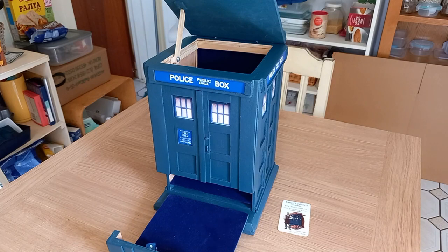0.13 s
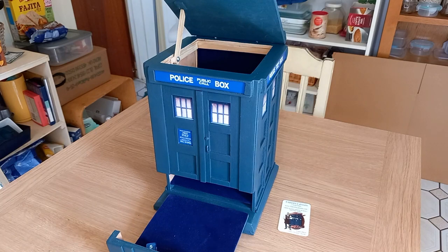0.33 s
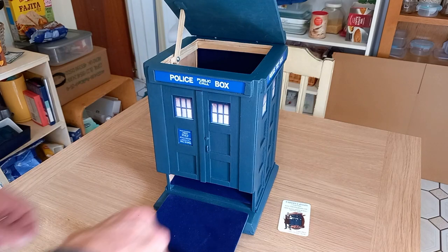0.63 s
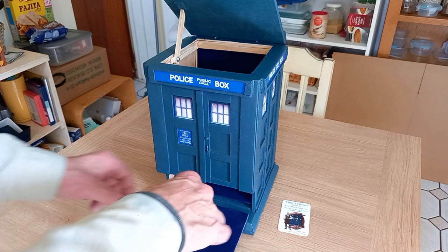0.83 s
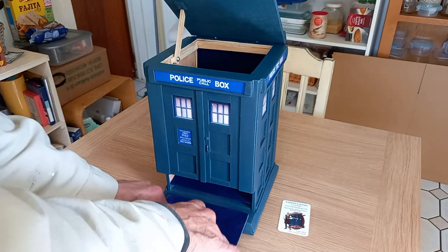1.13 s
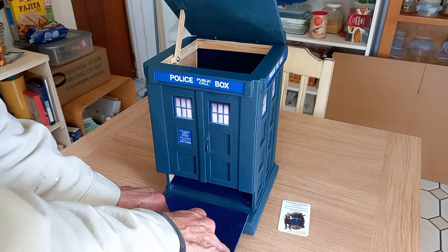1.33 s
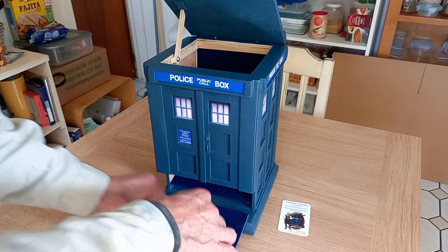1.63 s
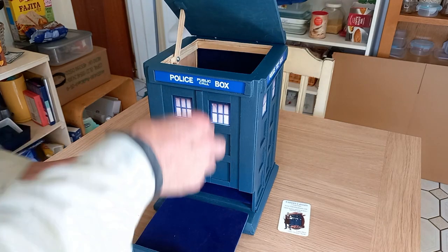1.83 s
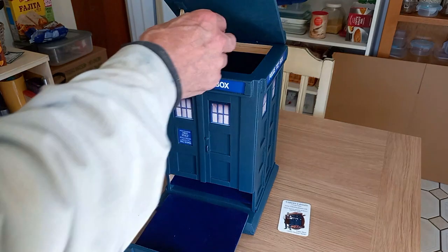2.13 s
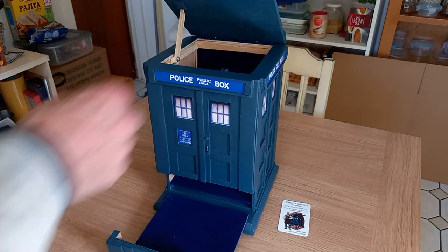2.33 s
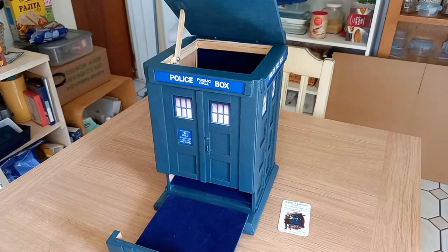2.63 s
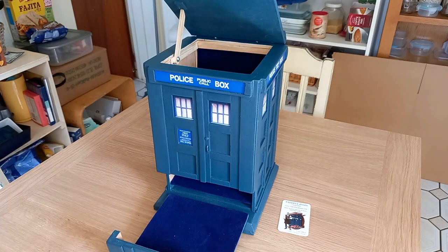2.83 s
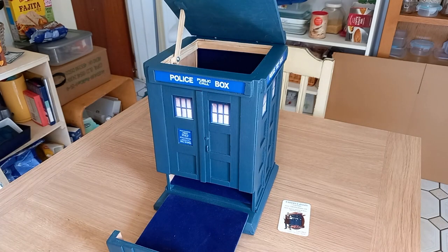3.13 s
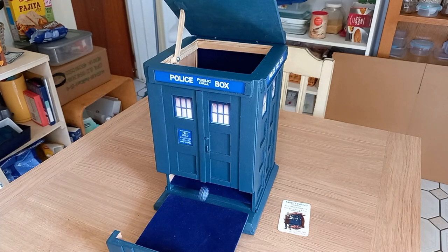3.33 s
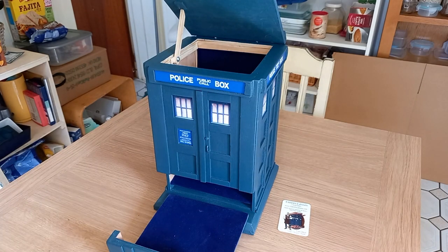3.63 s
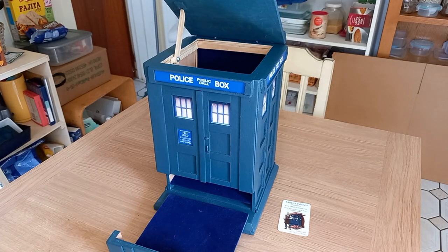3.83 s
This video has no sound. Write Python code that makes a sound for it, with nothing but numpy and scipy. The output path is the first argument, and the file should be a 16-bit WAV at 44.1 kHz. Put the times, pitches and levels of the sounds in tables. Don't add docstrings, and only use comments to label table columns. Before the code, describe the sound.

A die knocks down through a hollow wooden tower in rapid uneven blows, slides out, lands with a sharp knock on a felt-covered tray, rolls briefly and settles; close microphone, quiet furnished room, very faint birds before.

```python
import sys
import numpy as np
from scipy import signal
from scipy.fft import rfft, irfft
from scipy.io import wavfile
from scipy.ndimage import uniform_filter1d

SR = 44100
rng = np.random.default_rng(int(sys.argv[2]) if len(sys.argv) > 2 else 0)


def how_loud(loudness_db):
    steps = np.asarray(loudness_db, float) / 20
    return 10 ** steps


def persist_wave(psi):
    counts = np.round(np.clip(psi, -1, 1) * 32767).astype(np.int16)
    wavfile.write(sys.argv[1], SR, np.atleast_2d(counts).T)


N = 176400

# hz, level_db
AIR_SPECTRUM = [(20, -31.5), (45, -4), (92, -3.5), (200, -9.5), (530, -18), (1500, -13.5), (5000, -29),
                (16000, -35)]
AIR_DB = -72
# hz, left_right_likeness [0-1]
STEREO_LIKENESS = [(60, 0.45), (200, 0.43), (600, 0.58), (1500, 0.088), (4000, 0.05), (12000, 0.031)]

# hz, level_db
CHORUS_SPECTRUM = [(1300, -29), (1900, -16), (2500, -10), (3000, -1.5), (3700, -2.5), (4300, -9.5),
                   (4700, -16), (7000, -32.5)]
# time_s, level_db, left_minus_right_db
CHORUS_LEVEL = [(0, -69, 5), (0.901, -62, 4), (1.3, -67.5, 5), (1.8, -65.5, -1.5), (3.5, -63.5, -4),
                (4, -67, 1)]
# start_s, end_s, level_db, low_hz, high_hz
FLOCK_PASSES = [
    (-.2, .55, -69.5, 4150, 5400),
    (-.2, .8, -69, 1730, 2500),
    (1.3, 1.75, -90, 5000, 6770),
    (1.72, 2.5, -66, 4300, 7240),
    (3.55, 4.3, -66, 2130, 2920),
    (3.8, 4.3, -83, 8500, 10500),
]
# start_s, length_s, from_hz, to_hz, level_db
BIRD_NOTES = [(0.0, 0.073, 2900, 2898, -57.5), (0.001, 0.065, 4300, 4500, -62),
              (0.091, 0.37, 1825, 1880, -65), (0.373, 0.2, 2120, 2060, -65),
              (0.627, 0.14, 5720, 5460, -62.5), (1.106, 0.099, 4270, 4250, -62.5),
              (1.287, 0.093, 7140, 5770, -67.5), (1.358, 0.061, 5900, 3900, -68),
              (1.405, 0.092, 3900, 3004, -60.5), (1.719, 0.17, 3050, 3400, -62),
              (1.762, 0.088, 6800, 6100, -61), (1.737, 0.099, 4690, 4010, -59),
              (1.898, 0.055, 4920, 3710, -60), (1.925, 0.099, 7000, 5770, -52.5),
              (2.102, 0.15, 6900, 5800, -54), (2.103, 0.066, 4700, 3620, -55.5),
              (3.955, 0.028, 3300, 4500, -65.5)]
BIRD_ECHO_T60_S, BIRD_WOBBLE, BIRD_DIRECT_DB = 1.6, 0.0047, -18.5
# start_s, length_s, pitch_hz, level_db, second_partial_db
DOVE_COOS = [
    (0.104, 0.3, 353, -83.5, -5),
    (0.61, 0.25, 260, -83, -16),
    (1.012, 0.197, 320, -80.5, -17),
    (1.206, 0.18, 337, -79.5, -14),
    (1.344, 0.066, 248, -76, -25),
]

# start_s, end_s, level_db
SLEEVE_RUSTLE = (0.68, 1.03, -75.5)
# hz, level_db
SLEEVE_SPECTRUM = [(6000, -27), (8000, -5), (11000, 5), (12500, -26)]
# time_s, level_db
FAINT_TICK = (.5, -52)

# start_s, pitch_hz, level_db, t60_s
TABLE_THUMPS = [
    (2.393, 73.8, -37, 0.099),
    (2.683, 151.4, -60, .1),
    (3.131, 102, -52, 0.19),
    (3.558, 110, -49.5, .2),
    (3.565, 168, -52, 0.27),
    (3.745, 160.8, -66, .15),
]
# hz, level_db
THUD_SPECTRUM = [(30, -20), (60, -2), (110, 3), (180, -4)]

# hz, t60_s
ROOM_DECAY = [(250, 0.03), (1500, 0.3766), (6000, 0.0635), (15000, 0.14)]
# hz, level_db
ROOM_COLOUR = [(250, -2.5), (1500, 2), (6000, 7), (14000, 4.5)]
LEFT_DB, MIC_LOW_HZ, BASS_LEAK_DB = 0.5, 243.5, -41.5

# start_s, end_s, level_db
TRUNDLE_TO_CHUTE = (2.88, 3.1, -49)
CHUTE_SLIDE = (3.02, 3.155, -43.5)
TRAY_ROLL = (3.2, 3.43, -31.5)
ROLL_CONTACTS_PER_S, SLIDE_CATCHES_PER_S = 95, 76
# hz, level_db
ROLL_SPECTRUM = [(200, -2.0), (330, -2.0), (480, 7.5), (650, -0.5), (780, -8), (890, 5.5), (1000, -13.5),
                 (2500, -22.5), (5000, -50.5)]
SLIDE_SPECTRUM = [(320, 8), (1500, -7), (2300, 1), (3000, -15), (3900, -4), (5200, -17.5), (6600, -17),
                  (13000, -23)]

# time_s, peak_db, hardness_db
FLAP_BLOWS = [
    (2.263, -12.5, -55),
    (2.343, -17.5, -74),
]
TOP_BLOWS = [
    (2.390, -9, 2.5),
    (2.405, -16, -15),
    (2.427, -17.5, -4.5),
    (2.44, -16, 1),
]
MID_BLOWS = [
    (2.527, -3.5, -2.5),
    (2.556, -11.5, -15),
    (2.579, -10, -3.5),
    (2.6, -21.5, -13),
]
RAMP_BLOWS = [
    (2.622, -20, -12.5),
    (2.654, -30.5, -13),
    (2.668, -33, -17),
    (2.683, -14, -26),
    (2.711, -11, -7),
    (2.733, -17, -5),
    (2.763, -28, -21.5),
]
LOW_BLOWS = [
    (2.773, -2.5, 0.5),
    (2.838, -13, -3.5),
    (2.872, -15, -3),
]
CHUTE_BLOWS = [
    (3.094, -21.5, -39.5),
    (3.11, -31.5, -41),
    (3.128, -35, -38),
]
TRAY_BLOWS = [
    (3.1585, -3, -0.5),
    (3.222, -20.5, -7),
    (3.315, -22, -4.5),
    (3.348, -17, -7),
    (3.368, -29.5, -42),
]
REST_BLOWS = [
    (3.481, -14, -20),
    (3.555, -27, -31),
    (3.609, -47.5, -36),
    (3.744, -51.5, -53),
]
# pitch_hz, level_db, t60_s
FLAP_MODES = [(389, -3.5, 0.51), (260, -10, 0.4), (1147, -10, 0.19), (1215, -6, 0.099), (1837, -14.5, .04)]
TOP_MODES = [(259.6, -7.5, 0.2), (358, -5.5, 0.25), (427, -6.5, 0.11), (626.5, -4.5, 0.15), (767, 11, 0.02),
             (898.6, -5.5, 0.23), (1755, -3.5, 0.11), (2358, -21, 0.12), (2850, -18, 0.11),
             (3410, -8, 0.09), (5216, -23.5, .12)]
MID_MODES = [(340.4, -7, 0.24), (502, -12.5, 0.13), (648, -11.5, 0.27), (759, -1.5, 0.068),
             (860, -11.5, 0.11), (1754, -6, 0.057), (2253, 2, 0.052), (2830, -14.5, 0.084),
             (4130, -17.5, 0.06)]
RAMP_MODES = [(352.2, -2, .15), (414.8, -4.5, 0.6), (700, -12.5, 0.13), (761, -3.5, 0.078),
              (1490, -17.5, .04), (2170, -5.5, .07), (2250, -8.5, 0.12), (3663, -19.5, .05)]
LOW_MODES = [(306, -5, 0.088), (448, -7, 0.04), (521, -3.5, 0.21), (565, -5, 0.26), (725, -3, 0.074),
             (1137, -12, 0.14), (1140, -11.5, .15), (1218, -9, 0.32), (1480, -10.5, 0.039),
             (2273, -6.5, 0.08), (2370, -19.5, 0.48), (3550, -12, 0.071)]
CHUTE_MODES = [(254, 2, .2), (472, -2, 0.22), (1220, -12.5, .03)]
TRAY_MODES = [(258.5, -8.5, .15), (322, 1.5, 0.25), (511.2, -6, 0.22), (651, -7.5, 0.39), (886, -6.5, 0.27),
              (1577, -5.5, .05), (1870, -5.5, 0.063), (2164, -8.5, 0.063), (3110, -17, .15)]
REST_MODES = [(243.5, -9.5, 0.42), (410, -19.5, 0.18), (494.5, -15.5, 0.16), (673, 0, 0.079),
              (856, -18, 0.19)]
PANELS = [(FLAP_BLOWS, FLAP_MODES), (TOP_BLOWS, TOP_MODES), (MID_BLOWS, MID_MODES), (RAMP_BLOWS, RAMP_MODES),
          (LOW_BLOWS, LOW_MODES), (CHUTE_BLOWS, CHUTE_MODES), (TRAY_BLOWS, TRAY_MODES), (REST_BLOWS, REST_MODES)]
PANEL_BOOM_DB = (-15.5, 2.5, -6.5, -6, -7, -13.5, -2, -10.5)
PANEL_RATTLE_DB = (-17.5, -7.5, -19.5, -18, -15.5, -13, -14, -13)
# hz, level_db
CRACK_SPECTRUM = [(900, -30), (1600, 1), (2400, 2.5), (5700, -16), (9000, -21), (12400, -28.5),
                  (15500, -33.5), (16500, -71)]
# hz, level_db
BOX_SPECTRUM = [(150, -27), (240, 5), (500, 3), (900, -2.5), (1500, -11), (3000, -44)]
CRACK_T60_S, RATTLE_T60_S, BOX_T60_S, RISE_S = 0.027, 0.42, 0.24, 0.00048
MODE_SPREAD_DB, MODE_SPLIT = 2, 0.03
SOFT_TILT = 0.083
SNAP_HZ, SNAP_DB = 920, -9


def rms_one(x):
    return x / np.sqrt(np.mean(x ** 2) + 1e-20)


def at_hz(points, hz):
    table = np.array(points)
    return np.interp(np.log(np.maximum(hz, 1)), np.log(table[:, 0]), table[:, 1])


def coloured(spectrum, size):
    hz = np.fft.rfftfreq(size, 1 / SR)
    mid, side = rfft(rng.standard_normal((2, size)))
    alike = np.clip(at_hz(STEREO_LIKENESS, hz), -.99, .99)
    both = np.sqrt(1 + alike) * mid + np.sqrt(1 - alike) * side * np.array([[1], [-1]])
    octaves_beyond = np.log2(np.maximum(hz / spectrum[-1][0], 1))
    return rms_one(irfft(both * how_loud(at_hz(spectrum, hz) - 23 * octaves_beyond), size))


def drift(rate_hz):
    knots = rng.standard_normal(400)
    return np.interp(np.arange(N) / SR * rate_hz, np.arange(400), knots)


def swell(start_s, end_s, edge_s):
    t = np.arange(N) / SR
    return np.clip(np.minimum(t - start_s, end_s - t) / edge_s, 0, 1)


def onset(t, rise_s):
    return 1 - np.exp(-(t / rise_s) ** 2)


def room_air():
    return how_loud(AIR_DB) * coloured(AIR_SPECTRUM, N)


def chorus():
    t = np.arange(N) / SR
    time_s, level_db, left_db = np.transpose(CHORUS_LEVEL)
    pan = how_loud(np.interp(t, time_s, left_db) * np.array([[.5], [-.5]]))
    level = how_loud(np.interp(t, time_s, level_db) + drift(30))
    return level * pan * coloured(CHORUS_SPECTRUM, N)


def flocks():
    out = 0
    for start_s, end_s, level_db, low_hz, high_hz in FLOCK_PASSES:
        band = [(low_hz * .8, -18), (low_hz, 0), (high_hz, 0), (high_hz * 1.12, -20)]
        out = out + how_loud(level_db + 2.5 * drift(10)) * swell(start_s, end_s, .2) * coloured(band, N)
    return out


def birds():
    t, dry = np.arange(N) / SR, 0
    wobble = 1 + BIRD_WOBBLE * drift(90)
    for start_s, length_s, from_hz, to_hz, level_db in BIRD_NOTES:
        u = np.clip((t - start_s) / length_s, 0, 1)
        hz = to_hz + (from_hz - to_hz) * (1 - u) ** 1.6
        hz = hz * wobble ** (1 + abs(from_hz - to_hz) / 300)
        envelope = np.abs(np.sin(np.pi * u)) / np.sqrt(0.89 * length_s)
        dry = dry + how_loud(level_db) * envelope * np.sin(2 * np.pi * np.cumsum(hz) / SR)
    echo = rng.standard_normal((2, SR)) * how_loud(-60 * t[:SR] / BIRD_ECHO_T60_S) / np.sqrt(SR / 2)
    return how_loud(BIRD_DIRECT_DB) * dry + signal.fftconvolve(dry[None], echo, axes=1)[:, :N]


def dove():
    t, out = np.arange(N) / SR, 0
    for start_s, length_s, pitch_hz, level_db, second_db in DOVE_COOS:
        phase = 2 * np.pi * pitch_hz * t
        voice = np.sin(phase) + how_loud(second_db) * np.sin(2 * phase)
        out = out + how_loud(level_db + 5) * swell(start_s, start_s + length_s, 0.022) * voice
    return out * how_loud(2.7 * drift(24.58)) * how_loud(np.array([[3], [-3]]))


def sleeve():
    start_s, end_s, level_db = SLEEVE_RUSTLE
    return how_loud(level_db + 1.7 * drift(49)) * swell(start_s, end_s, 0.15) * coloured(SLEEVE_SPECTRUM, N)


def tick():
    time_s, level_db = FAINT_TICK
    out = np.zeros((2, N))
    out[:, int(time_s * SR)] = how_loud(level_db)
    return out


def table_thumps():
    t, out = np.arange(N) / SR, 0
    for start_s, pitch_hz, level_db, t60_s in TABLE_THUMPS:
        decay = how_loud(level_db - 60 * np.maximum(t - start_s, 0) / t60_s)
        out = out + decay * swell(start_s, 9, .01) * np.sin(2 * np.pi * pitch_hz * (t - start_s))
    return out


def table_thud(near):
    shake = np.sqrt(uniform_filter1d(near[0] ** 2, size=600) + 1e-18) ** 0.77
    return how_loud(BASS_LEAK_DB) * shake * coloured(THUD_SPECTRUM, N)


def room(x):
    t, tail = np.arange(SR // 2) / SR, 0
    edges_hz = 100 * 2 ** np.arange(0, 7.6, .5)
    white = coloured([(20, 0), (20000, 0)], SR // 2)
    for low_hz, high_hz in zip(edges_hz, edges_hz[1:]):
        hz = np.sqrt(low_hz * high_hz)
        t60_s = at_hz(ROOM_DECAY, hz)
        band_pass = signal.butter(2, [low_hz, high_hz], "band", fs=SR, output="sos")
        decay = how_loud(at_hz(ROOM_COLOUR, hz) - 60 * t / t60_s) * np.sqrt(14 / t60_s / SR)
        tail = tail + signal.sosfilt(band_pass, white) * decay
    return signal.fftconvolve(x[None], tail * np.clip(t / 0.034, 0, 1), axes=1)[:, :N]


def rolling():
    rumble = coloured(ROLL_SPECTRUM, N) * how_loud(3.5 * drift(ROLL_CONTACTS_PER_S))
    level = 0
    for (start_s, end_s, level_db), edge_s in ((TRAY_ROLL, 0.056), (TRUNDLE_TO_CHUTE, 0.041)):
        level = level + how_loud(level_db) * swell(start_s, end_s, edge_s)
    return rumble * level


def sliding():
    start_s, end_s, level_db = CHUTE_SLIDE
    scrape = coloured(SLIDE_SPECTRUM, N) * how_loud(level_db + 3 * drift(SLIDE_CATCHES_PER_S))
    return scrape * swell(start_s, end_s, 0.015)


def panel_ring(modes, hard_db):
    t = np.arange(SR // 2) / SR
    luck = rng.standard_normal((3, 2, 12, 1))[:, :, :len(modes)]
    hz, level_db, t60_s = np.transpose(modes)[:, :, None]
    level_db = level_db + SOFT_TILT * min(hard_db, 0) * np.maximum(np.log2(hz / 700), 0)
    level_db = level_db - 4.5 + MODE_SPREAD_DB * (luck[0, 0] + 0.45 * luck[0])
    split_hz = hz * (1 + MODE_SPLIT * luck[2, 0])
    pair = np.sin(2 * np.pi * hz * t + 0.23 * luck[1])
    pair = pair + 0.65 * np.sin(2 * np.pi * split_hz * t + 0.19 * luck[2])
    rings = how_loud(level_db - 60 * t / np.clip(t60_s, .02, .6)) * pair
    return rings.sum(1) * onset(t, RISE_S * (3 - hard_db / 20)) / 2


def box_boom(boom_db, hard_db):
    t = np.arange(SR // 2) / SR
    decay = how_loud(boom_db - 60 * t / BOX_T60_S)
    return coloured(BOX_SPECTRUM, SR // 2) * decay * onset(t, RISE_S * (0.73 - hard_db / 20)) / 3


def contact_crack(rattle_db, hard_db):
    t = np.arange(SR // 2) / SR
    tilt_db = 12 * SOFT_TILT * hard_db
    colour = [(hz, level_db + tilt_db * max(np.log2(hz / 3000), 0)) for hz, level_db in CRACK_SPECTRUM]
    decay = how_loud(-60 * t / CRACK_T60_S) + how_loud(rattle_db - 60 * t / RATTLE_T60_S)
    crack = coloured(colour, SR // 2) * how_loud(0.79 * hard_db) * decay / 3.3
    return crack * onset(t, RISE_S * (.12 - hard_db / 40))


def contact_snap(hard_db):
    cycle = np.minimum(SNAP_HZ * np.arange(SR // 2) / SR, 1)
    return how_loud(SNAP_DB + hard_db) * np.sin(2 * np.pi * cycle) * np.sin(np.pi * cycle)


def knocks():
    out = np.zeros((2, N + SR))
    for (blows, modes), boom_db, rattle_db in zip(PANELS, PANEL_BOOM_DB, PANEL_RATTLE_DB):
        for time_s, peak_db, hard_db in blows:
            blow = panel_ring(modes, hard_db) + box_boom(boom_db, hard_db)
            blow = blow + contact_crack(rattle_db, hard_db) + contact_snap(hard_db)
            i = int(time_s * SR)
            out[:, i:i + SR // 2] += how_loud(peak_db) * blow
    return out[:, :N]


def scene():
    outdoors = chorus() + flocks() + birds() + dove()
    die = knocks() + rolling() + sliding()
    near = (die + room(die.mean(0))) * how_loud(np.array([[LEFT_DB / 2], [-LEFT_DB / 2]]))
    low_cut = signal.butter(8, MIC_LOW_HZ, "high", fs=SR, output="sos")
    thin = signal.sosfilt(low_cut, near)
    return room_air() + outdoors + sleeve() + tick() + table_thumps() + table_thud(near) + thin


def band_limit(x):
    return signal.sosfilt(signal.butter(12, 16450, fs=SR, output="sos"), x)


def record(dry):
    top_cut = signal.butter(14, 15300, fs=SR, output="sos")
    held = signal.sosfilt(top_cut, np.clip(dry, -.95, .95))
    return band_limit(held)


dry = scene()
out = record(dry)
persist_wave(out)
```